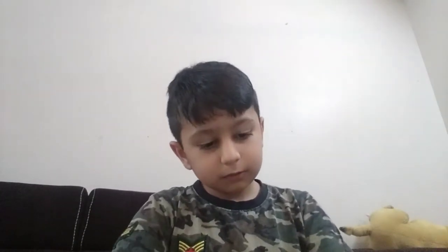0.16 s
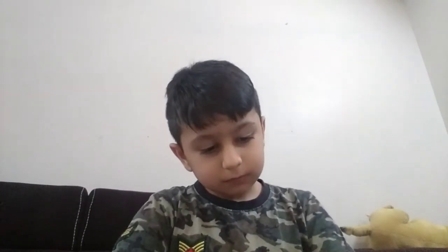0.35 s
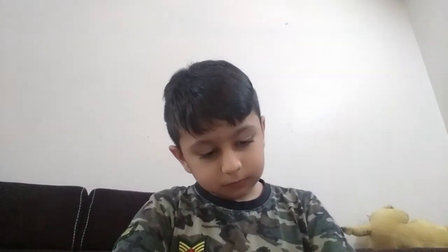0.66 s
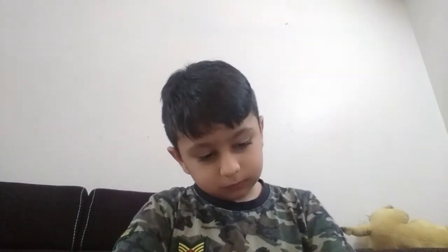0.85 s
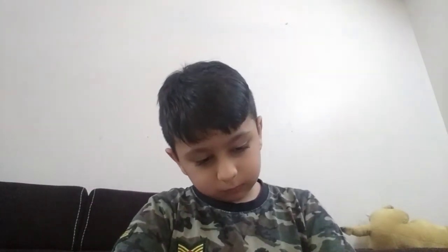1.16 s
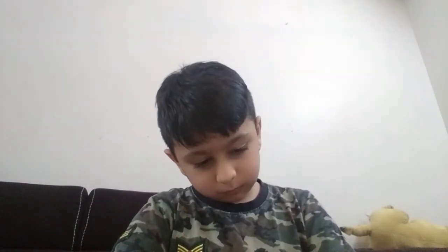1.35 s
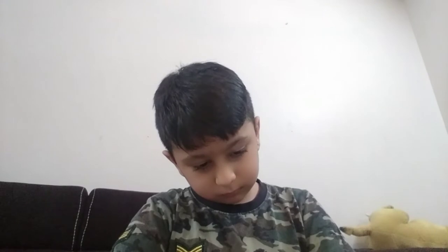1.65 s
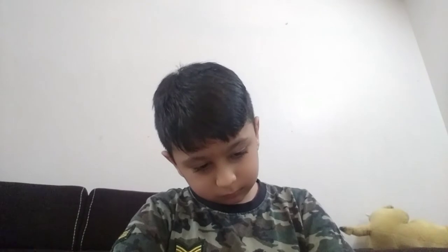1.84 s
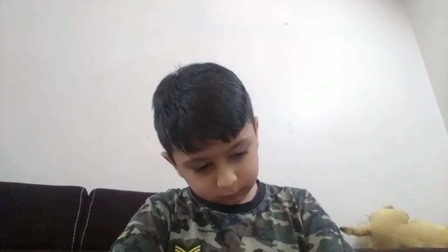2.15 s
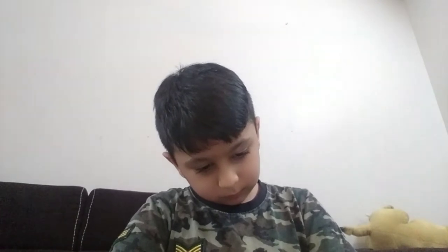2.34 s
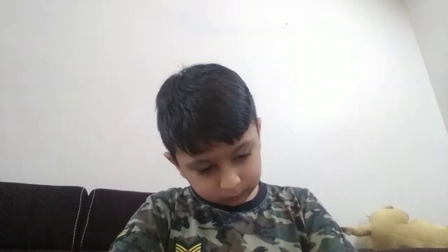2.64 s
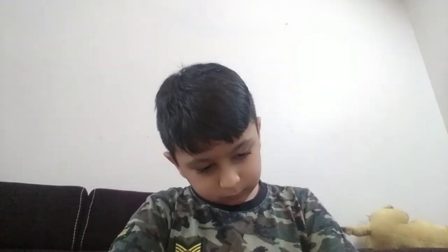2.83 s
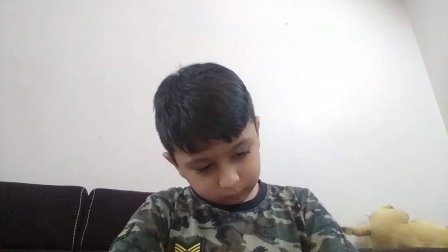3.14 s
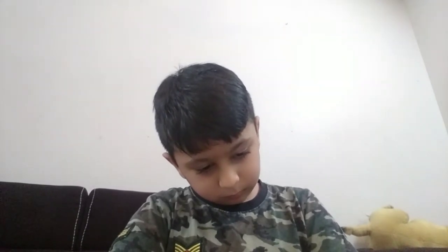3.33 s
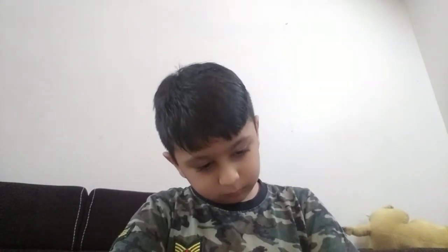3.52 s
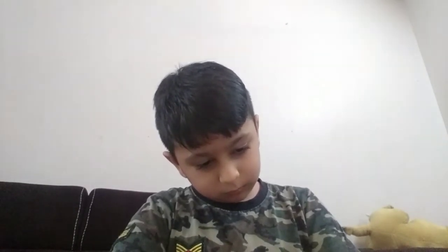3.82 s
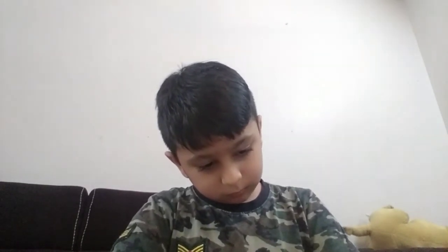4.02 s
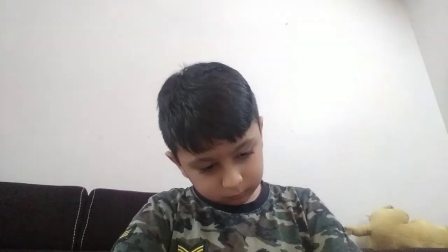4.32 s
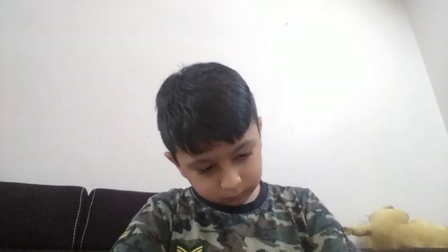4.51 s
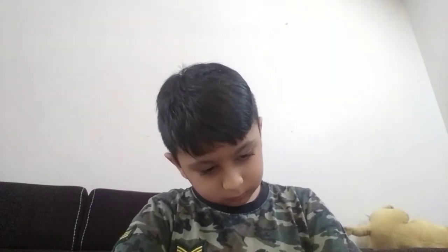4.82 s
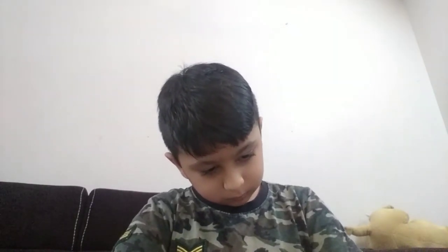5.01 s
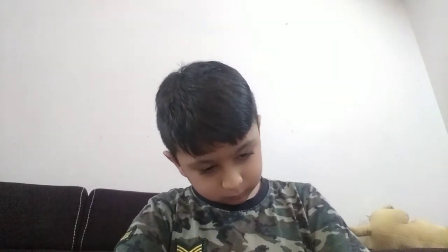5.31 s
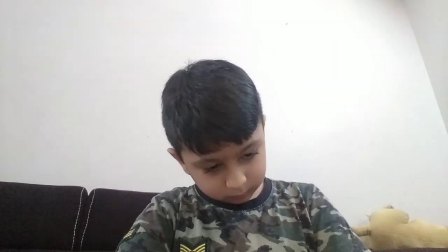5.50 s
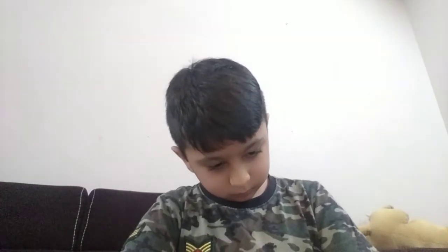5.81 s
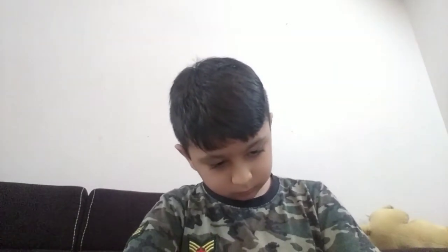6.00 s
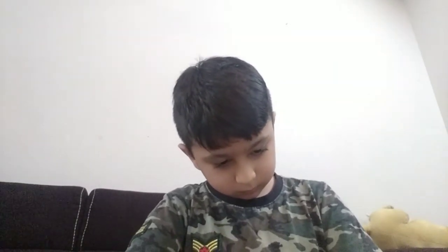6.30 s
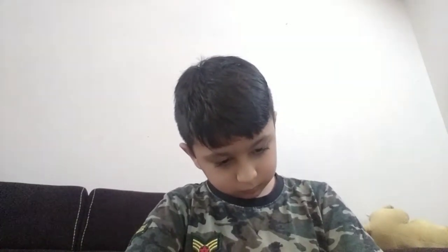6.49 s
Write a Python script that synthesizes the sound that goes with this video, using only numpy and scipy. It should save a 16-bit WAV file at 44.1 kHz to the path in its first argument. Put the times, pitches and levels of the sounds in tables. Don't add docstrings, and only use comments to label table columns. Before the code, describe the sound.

A boy looking down scribbles with a felt-tip pen on paper. One hard, woody clack starts it, followed by fast, bright, papery swishes in pairs, growing stronger. After a gap of about half a second the strokes return, with dull hand taps and plastic ticks. A second, brighter clack comes just before the end. Close microphone, small quiet room, faint low background.

```python
import sys
import numpy as np
from scipy import signal
from scipy.fft import rfft, irfft, next_fast_len
from scipy.io import wavfile
from scipy.ndimage import uniform_filter1d, map_coordinates

SR = 44100
rng = np.random.default_rng(int(sys.argv[2]) if len(sys.argv) > 2 else 0)


def master_out(mix):
    frames = np.transpose(np.atleast_2d(mix))
    ceiling = np.clip(frames, -1, 1)
    pcm = np.round(ceiling * 32767).astype(np.int16)
    wavfile.write(sys.argv[1], SR, pcm)


def attenuation_scalar(level_db):
    decades = np.asarray(level_db, float) / 20
    return 10 ** decades


N = 293706

# time in seconds, pen lean as bright over dull hiss in dB, pressure in dB.
GRIP = [(0, -0.5, 13.5), (.5, 7.5, 6), (1.2, 6, 1.3), (1.8, 6, 2.5), (2.3, 0, 1.2), (2.6, 2.5, -1.5),
        (3.4, -1.5, -3.5), (3.9, -0.7, 6.5), (4.3, 2.5, 7.5), (4.6, 0, 4), (5, 2, 1.2), (5.4, 2.5, -6.5),
        (5.8, -.9, 0.5), (6.3, -2.5, -1.5), (6.66, 6.5, 1)]


def unit(x):
    return x / np.sqrt(np.mean(x ** 2) + 1e-20)


def along(points, hz):
    f, v = np.transpose(points)
    return np.interp(np.log(hz + 1), np.log(f + 1), v)


def curves(rows):
    s, *cols = np.transpose(rows)
    return [np.interp(np.arange(N) / SR, s, c) for c in cols]


def wobble(rate):
    knots = rng.standard_normal(int(N * rate / SR) + 4)
    return map_coordinates(knots, [np.arange(N) * rate / SR])


def filtered(x, response):
    m = next_fast_len(N + SR // 2)
    return irfft(rfft(x, m) * response(np.fft.rfftfreq(m, 1 / SR)), m)[..., :N]


def patched(source, window, gain_db, bands, frames):
    z = signal.stft(source, nperseg=window)[2]
    field = uniform_filter1d(rng.standard_normal(z.shape), bands, 0)
    field = uniform_filter1d(field, frames, 1)
    return signal.istft(z * attenuation_scalar(gain_db * unit(field)), nperseg=window)[1]


def rush(source, spectrum, patchy_db, lines_db=0):
    uneven = patched(source, 256, patchy_db, 4, 10)
    uneven = patched(uneven, 1024, lines_db, 2, 8)[:N]

    def colour(hz):
        below = 87 * (hz < spectrum[0][0])
        above = 61 * (hz > spectrum[-1][0])
        return attenuation_scalar(along(spectrum, hz) - below - above)

    return unit(filtered(uneven, colour))


def pen():
    # frequency in Hz, density in dB per Hz.
    dull_hiss = [(4500, -30), (4950, -22), (5150, -1), (5900, 0), (7000, -4), (7700, -20), (9000, -52)]
    # frequency in Hz, density in dB per Hz.
    bright_hiss = [(6000, -37.5), (7000, -14.5), (7700, -0.5), (8700, 0), (9450, -1), (9750, -24),
                   (10500, -40)]
    # frequency in Hz, density in dB per Hz.
    sheet_edge = [(9300, -33), (9650, 0), (10400, -2.5), (10900, -9), (11800, -13), (12300, -31.5)]
    # frequency in Hz, density in dB per Hz.
    fibre_fizz = [(11000, -47), (11900, -16), (12300, -9.5), (14700, -8.5), (15700, -8)]
    # frequency in Hz, density in dB per Hz.
    barrel_rasp = [(1100, -26.5), (1600, -10), (2200, -8), (3200, -6.5), (3900, -8.5), (4700, -2.5),
                   (5500, -22)]
    # frequency in Hz, density in dB per Hz.
    table_rub = [(150, -30.5), (290, 4), (450, -9), (700, 1.5), (950, -4.5), (1300, -11), (2000, -55)]
    edge_db, fizz_db, rasp_db, rub_db = -11, -14.5 + 10, -16.5 + 17, -25 + 11.5 - 0
    rub_db = -25 - 13.5

    dull, bright, edge, fizz = strokes()
    speed = np.hypot(dull, bright)
    press_db = curves(GRIP)[1]
    slip_db = 0.81 * rng.exponential(size=N) + 0.58 * wobble(60) + 1.16 * wobble(400)
    slips = rng.standard_normal(N) * attenuation_scalar(slip_db)
    hiss = dull * rush(slips, dull_hiss, patchy_db=2.1, lines_db=3.5)
    hiss += bright * rush(slips, bright_hiss, patchy_db=1.2, lines_db=1.5)
    top = edge * attenuation_scalar(edge_db) * rush(slips, sheet_edge, patchy_db=2.0, lines_db=4.5)
    fizz_level = fizz * speed ** (1.182 - 1) * attenuation_scalar(fizz_db)
    top += fizz_level * rush(slips, fibre_fizz, patchy_db=3.0, lines_db=1.0)
    rasp_level = speed ** 1.4 * attenuation_scalar(rasp_db + press_db)
    barrel = rasp_level * rush(slips, barrel_rasp, patchy_db=3.5, lines_db=2.5)
    rub_level = speed ** 0.69 * attenuation_scalar(rub_db + 0.79 * press_db)
    table = rub_level * rush(rng.standard_normal(N), table_rub, patchy_db=6)
    return hiss + top + barrel + table


def strokes():
    # start in seconds, peak in dB, speed-up in seconds, jerk from 0 to 1.
    pushes = [(0.1258, -52.5, 0.1, 0.82), (0.3843, -47.5, 0.047, 0.42), (0.614, -46, 0.026, 0.67),
              (0.8108, -46, 0.05, 0.14), (1.026, -46, 0.029, 0.5), (1.227, -45.5, 0.026, .16),
              (1.435, -46.5, 0.048, 0), (1.649, -47, 0.034, 0.74), (1.8429, -46, .033, .55),
              (2.0604, -43, 0.036, 0.72), (2.291, -41.5, 0.025, 0.54), (2.5335, -42.5, 0.04, 0.9),
              (2.8083, -42, 0.034, 0.38), (3.065, -43.5, 0.026, .7), (3.2887, -42.5, 0.014, 0.23),
              (3.8658, -55, 0.0048, 0.2), (3.947, -44.5, 0.05, 0.01), (4.1783, -44.5, 0.038, 0.57),
              (4.4159, -44.5, 0.013, 0.3), (4.6222, -42.5, 0.027, 0.72), (4.841, -41.5, 0.031, 0.76),
              (5.062, -41.5, 0.033, 0.4), (5.3041, -39.5, 0.036, 0.5), (5.547, -38.5, 0.031, .6),
              (5.7803, -42.5, 0.04, 0.3), (6.0475, -41.5, 0.026, .44), (6.2742, -45, 0.045, 0.94),
              (6.3959, -40.5, 0.0059, 0.3), (6.5413, -46.5, 0.033, .07)]
    # start in seconds, peak in dB, speed-up in seconds, lift in dB.
    pulls = [(0.2724, -59, 0.036, -1.5), (0.489, -47, 0.056, -5), (0.691, -45.5, 0.074, -2.5),
             (0.921, -43, .037, -2.5), (1.118, -45.5, 0.038, -4), (1.334, -45.5, 0.032, -4),
             (1.554, -45, 0.035, -2), (1.7502, -45, 0.023, 0.5), (1.9357, -42.5, 0.047, -0.5),
             (2.1546, -42, 0.06, 0), (2.3966, -40, 0.059, 6), (2.659, -42.5, 0.071, 7),
             (2.95, -42, 0.027, 1.1), (3.175, -43.5, 0.032, 3), (4.0667, -43.5, 0.024, 1),
             (4.3087, -44.5, 0.014, 4), (4.517, -45.5, 0.02, -3.5), (4.7245, -44, 0.033, -2.5),
             (4.956, -39.5, 0.013, -1.5), (5.173, -41, 0.033, -4), (5.422, -41.5, 0.026, -3),
             (5.658, -41, 0.023, -2), (5.917, -44, 0.045, 22), (6.1643, -43.5, 0.012, -1)]
    pull_jerk = 0.15
    slow_down_s, slow_down_shrinks = 0.11, 0.55

    power, t = np.zeros((4, N)), np.arange(1, SR // 2) / SR
    when, lean, press = np.transpose(GRIP)
    rows = []
    for s, db, rise, jerk in pushes:
        edge_db = min(1.8 * np.interp(s, when, press), 3)
        rows.append((s, db, rise, jerk, np.interp(s, when, lean), edge_db, 0))
    for s, db, rise, lift_db in pulls:
        bright_db = -1 + 0.24 * np.interp(s, when, lean) - 0.11 * lift_db
        edge_db = 0.4 * np.interp(s, when, press) - 0.71 * lift_db
        rows.append((s, db, rise, pull_jerk, bright_db, edge_db, lift_db))

    for s, db, rise, jerk, bright_db, edge_db, lift_db in rows:
        smooth = np.sin(np.clip(t / rise, 0, 1) * np.pi / 2) ** 2
        start = np.minimum(t / 0.0034, 1) * (jerk + (1 - jerk) * smooth)
        braking = np.maximum(t - rise, 0) / (slow_down_s - slow_down_shrinks * rise)
        speed = start * attenuation_scalar(db - 20 * braking ** 2)
        share = 1 / (1 + attenuation_scalar(-2 * bright_db))
        shares = [1 - share, share, attenuation_scalar(2 * edge_db), attenuation_scalar(-2 * lift_db)]
        part = power[:, round(s * SR):][:, :len(t)]
        part += np.outer(shares, speed ** 2)[:, :part.shape[1]]
    return np.sqrt(power)


def knocks():
    # time in seconds, blow in dB, object struck 0 or 1, contact in seconds.
    hard_blows = [
        (0.1138, -26.5, 0, 0.00017),
        (0.1261, -14.5, 0, 0.0002),
        (0.1298, -10, 0, 0.000081),
        (.144, -22, 0, 0.00011),
        (.150, -32.5, 0, 0.00014),
        (6.398, -18.5, 1, 0.000067),
        (6.3992, -9.5, 1, 0.00011),
        (6.413, -20.5, 1, 0.00016),
    ]
    # frequency in Hz, width in Hz, level in dB.
    resonances = [
        [(352, 44, 3), (630, 350, -7.5), (1100, 110, 0), (1560, 114, -5), (2050, 200, -4.5), (2230, 110, -2),
         (2900, 670, 0)],
        [(377, 70, 3.5), (795, 140, -1), (1190, 164, 2), (1480, 150, -1), (2300, 240, 2), (3200, 220, 4.5),
         (4760, 420, 10.5), (5830, 240, -46)],
    ]
    blows, t = np.zeros((len(resonances), N)), np.arange(400) / SR
    for s, db, which, contact in hard_blows:
        push = t ** 2 * np.exp(-t / contact)
        blows[int(which), round(s * SR):][:400] += attenuation_scalar(db + 29.5) * push / push.sum()

    def ring(modes):
        def response(f):
            total = 0
            for k, (centre, width, db) in enumerate(modes):
                damping = 1j * f * width
                total = total + (-1) ** k * attenuation_scalar(db) * damping / (centre ** 2 - f ** 2 + damping)
            return total
        return response

    return sum(filtered(blow, ring(modes)) for blow, modes in zip(blows, resonances))


def soft_hits(events, t60, attack, rough, gain_db):
    out, t = np.zeros(N + SR), np.arange(SR // 4) / SR
    for s, db, hz in events:
        drift = np.cumsum(rng.standard_normal(len(t))) * rough * np.sqrt(hz / SR)
        shape = attenuation_scalar(db + gain_db - 60 * t / t60) * (1 - np.exp(-t / attack))
        out[round(s * SR):][:len(t)] += shape * np.sin(2 * np.pi * hz * t + drift)
    return out[:N]


def hand_contacts():
    # time in seconds, peak in dB, frequency in Hz.
    turn_taps = [(.401, -58.5, 271), (.551, -68, 796), (.79, -47, 845), (.97, -56, 661), (1.05, -56, 281),
                 (1.382, -56.5, 873), (1.597, -58, 703), (1.681, -53, 280), (1.793, -56.5, 780),
                 (2.085, -59.5, 630), (2.459, -64, 630), (2.567, -56.5, 723), (2.72, -55.5, 630),
                 (2.816, -54, 305), (2.994, -49, 306), (3.09, -62.5, 558), (3.314, -60.5, 360),
                 (3.869, -52.5, 860), (4.116, -51.5, 377), (4.214, -68, 350), (4.445, -52, 646),
                 (4.544, -50.5, 941), (4.665, -56, 1054), (4.77, -55, 1028), (5.02, -57, 408),
                 (5.337, -61, 624), (5.423, -62, 658), (5.787, -53, 758), (6.047, -64, 260)]
    # time in seconds, peak in dB, frequency in Hz.
    barrel_ticks = [(1.496, -58.5, 2420), (1.7, -55, 2390), (2.1221, -58, 2280), (2.59, -54.5, 2373),
                    (4.1883, -53.5, 2787), (4.804, -59, 2600), (5.0198, -57, 2580), (5.2649, -58.5, 2500),
                    (5.5503, -59, 2900), (5.7843, -48, 1884)]
    # time in seconds, peak in dB, frequency in Hz.
    wrist_thumps = [(.608, -65, 103), (1.224, -60, 111), (1.296, -57, 109.4), (4.427, -56.5, 104.8),
                    (4.596, -61.5, 110), (4.713, -61, 101), (5.318, -58, 108), (5.398, -56.5, 96),
                    (5.582, -56.5, 107), (5.701, -54.5, 100), (5.915, -63, 107)]
    taps = soft_hits(turn_taps, t60=0.084, attack=0.0061, rough=1.06, gain_db=7.5)
    ticks = soft_hits(barrel_ticks, t60=0.044, attack=0.0016, rough=0.61, gain_db=10.0)
    thumps = soft_hits(wrist_thumps, t60=0.13, attack=0.0087, rough=0.24, gain_db=11.0)
    return taps + ticks + thumps


def scrapes():
    # time in seconds, level in dB, low edge in Hz, high edge in Hz, length in seconds.
    drags = [
        (0.127, -46, 40, 142, 0.12),
        (.13, -37.5, 196, 1510, 0.11),
        (0.123, -55, 2940, 4900, 0.066),
        (3.602, -77, 5000, 6000, 0.08),
        (3.702, -66.5, 3070, 14000, .006),
        (3.812, -70.5, 2000, 3200, 0.14),
        (3.868, -51.5, 550, 2800, 0.12),
        (5.783, -48, 1600, 2330, 0.036),
        (6.398, -34, 248, 6100, 0.051),
        (6.399, -47, 199, 1990, 0.074),
    ]
    fade_db, lumps_db = 17, 1.8
    out, t = np.zeros(N + SR), np.arange(SR // 4) / SR
    for s, db, low_hz, high_hz, length in drags:
        lumps = rng.standard_normal(len(t)) * attenuation_scalar(lumps_db * wobble(250)[:len(t)])
        sos = signal.butter(2, [low_hz, high_hz], "bandpass", fs=SR, output="sos")
        band = unit(signal.sosfilt(sos, lumps))
        attack = np.minimum(t / 0.00046, 1)
        settling = 1 + np.exp((t - length) / 0.0041)
        out[round(s * SR):][:len(t)] += band * attenuation_scalar(db - fade_db * t / length) * attack / settling
    return out[:N]


def squeak():
    # time in seconds, level in dB.
    squeak_level = [(4.03, -120), (4.12, -75), (4.3, -72), (4.5, -75), (4.65, -92), (4.87, -76),
                    (5.05, -71), (5.18, -75), (5.27, -120)]
    # frequency in Hz, level in dB.
    squeak_lines = [
        (3004, 0.5),
        (3332, 1.5),
    ]
    t = np.arange(N) / SR
    lines = np.zeros(N)
    for hz, db in squeak_lines:
        breaks = attenuation_scalar(db + 4.5 * wobble(20))
        lines += breaks * np.sin(2 * np.pi * hz * t + 2.4 * wobble(70))
    return attenuation_scalar(curves(squeak_level)[0]) * lines


def room(x):
    # frequency in Hz, time to fall 60 dB in seconds.
    room_decay = [(150, 0.33), (600, 0.24), (2000, 0.34), (8000, 0.22)]
    hz, t, z = signal.stft(rng.standard_normal(SR // 2), SR, nperseg=256)
    decay = attenuation_scalar(-60 * t / along(room_decay, hz)[:, None])
    tail = signal.istft(z * decay, SR, nperseg=256)[1]
    delayed = np.pad(x, (150, 0))
    return signal.fftconvolve(delayed, tail / np.linalg.norm(tail))[:N]


def room_floor():
    # frequency in Hz, density in dB per Hz.
    floor_spectrum = [(26, -19), (105, -7.5), (225, -16.5), (480, -17.5), (700, -32), (2100, -26.5),
                      (2600, -36), (15700, -43)]
    level = attenuation_scalar(-66.5 - 3.5 + 0.25 * wobble(2.0))
    return level * rush(rng.standard_normal(N), floor_spectrum, patchy_db=0.5)


def scene():
    hand, blows = hand_contacts(), knocks()
    direct = pen() + hand + blows + scrapes() + squeak()
    reverberant = attenuation_scalar(-11.5) * room(blows) + attenuation_scalar(-2.5) * room(hand)
    return (direct + reverberant + room_floor())[None]


def roll_off(x):
    return signal.sosfilt(signal.butter(12, 16450, fs=SR, output="sos"), x)


def record(dry):
    mix = filtered(dry, lambda hz: hz < 15800)
    return roll_off(mix)


dry = scene()
out = record(dry)
master_out(out)
```